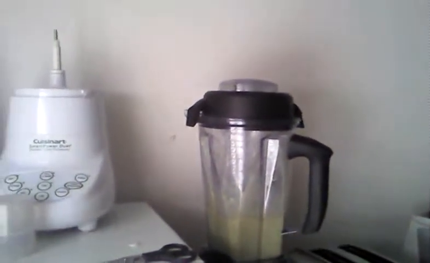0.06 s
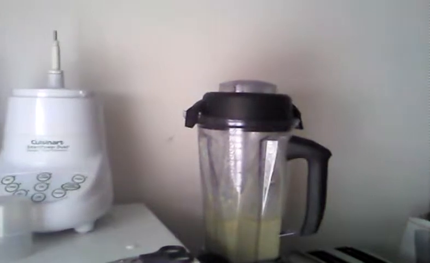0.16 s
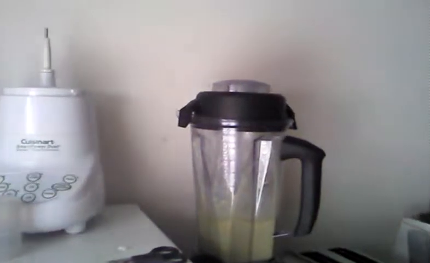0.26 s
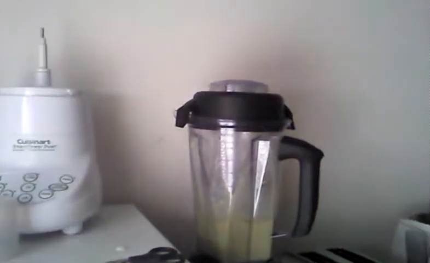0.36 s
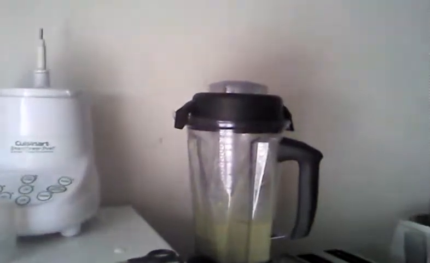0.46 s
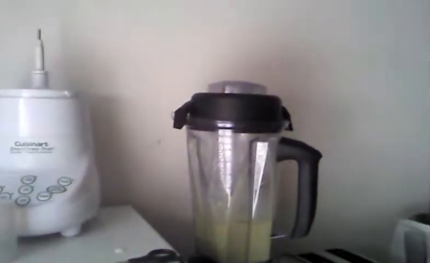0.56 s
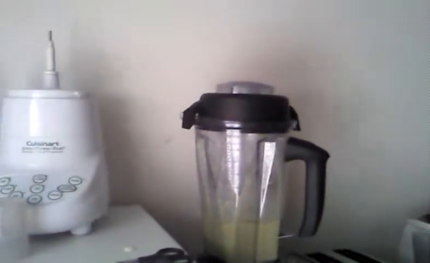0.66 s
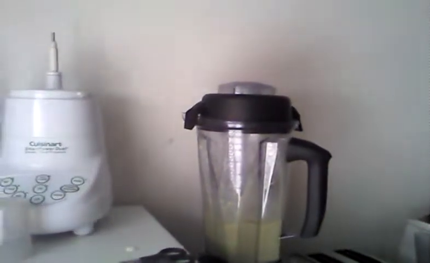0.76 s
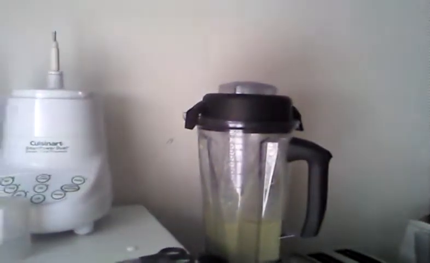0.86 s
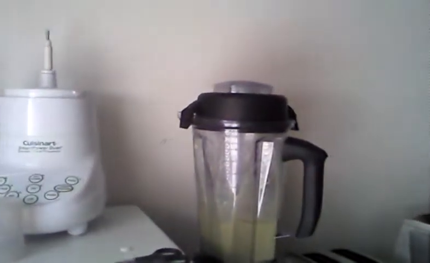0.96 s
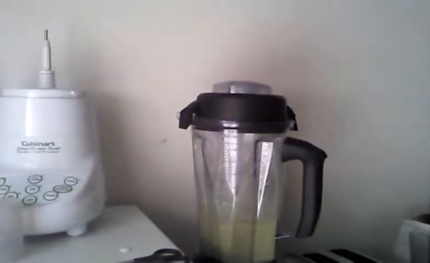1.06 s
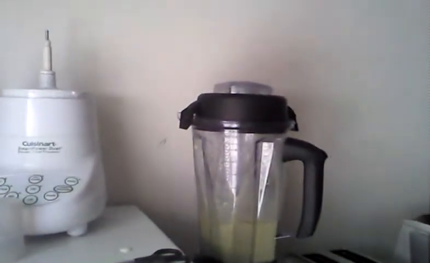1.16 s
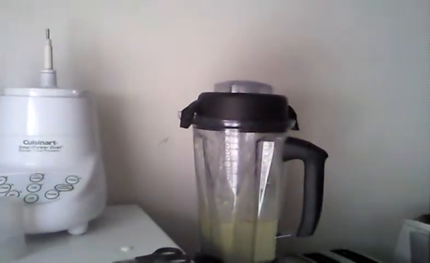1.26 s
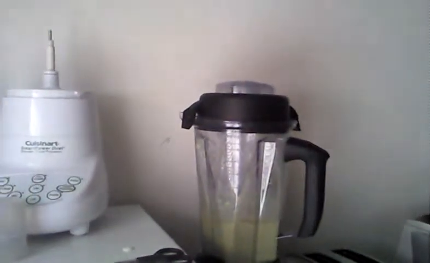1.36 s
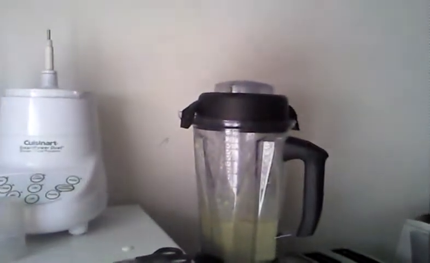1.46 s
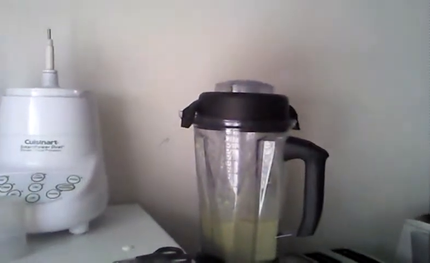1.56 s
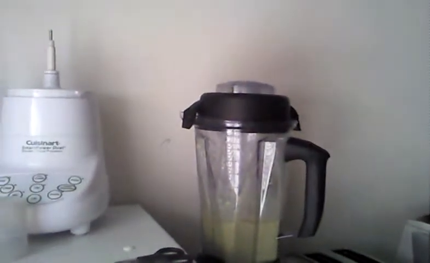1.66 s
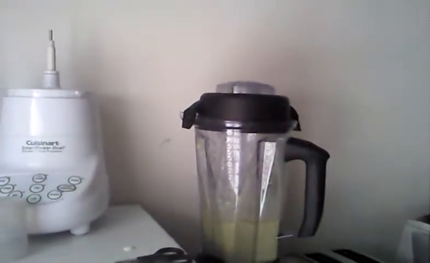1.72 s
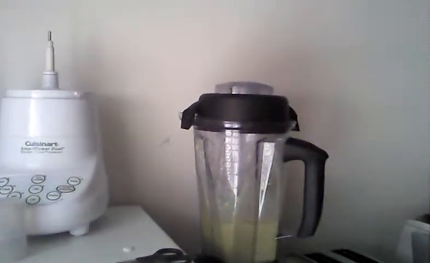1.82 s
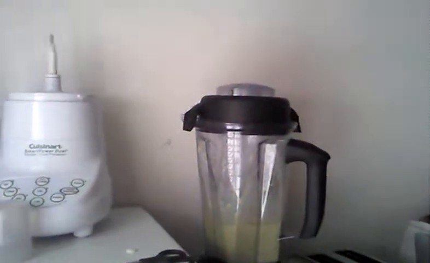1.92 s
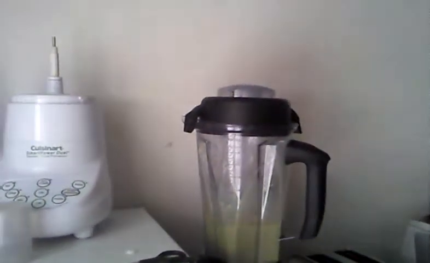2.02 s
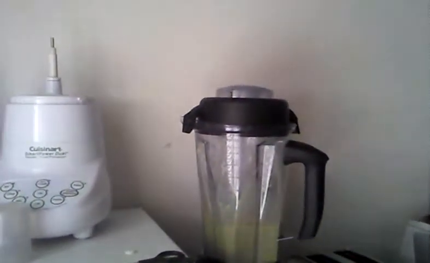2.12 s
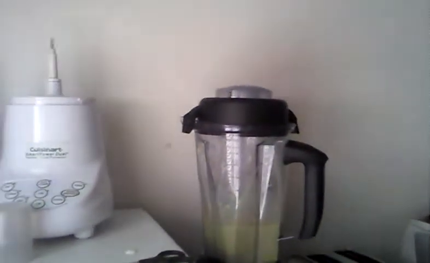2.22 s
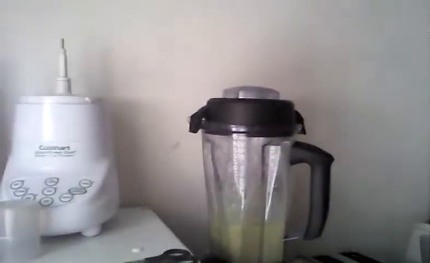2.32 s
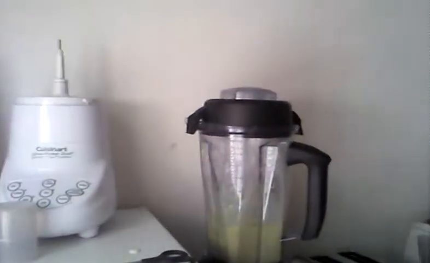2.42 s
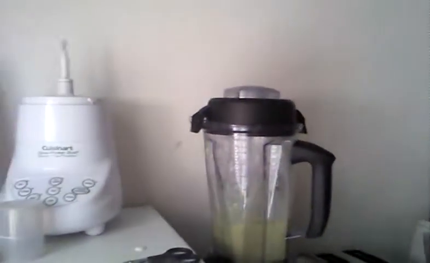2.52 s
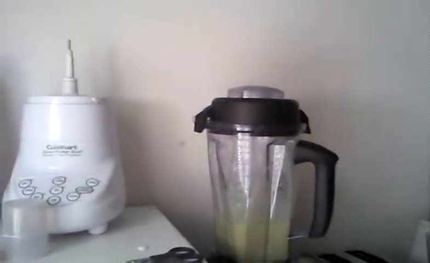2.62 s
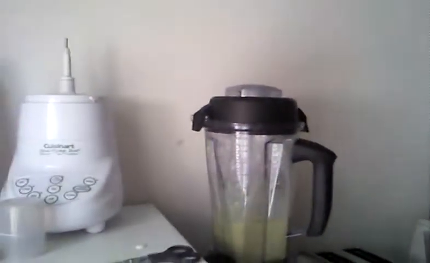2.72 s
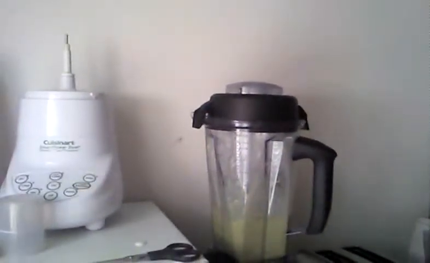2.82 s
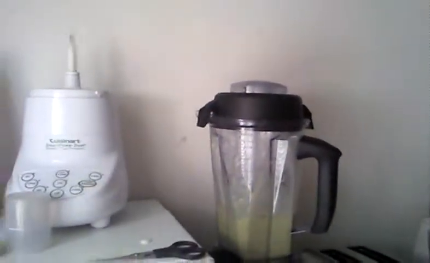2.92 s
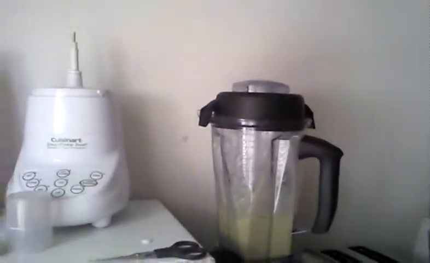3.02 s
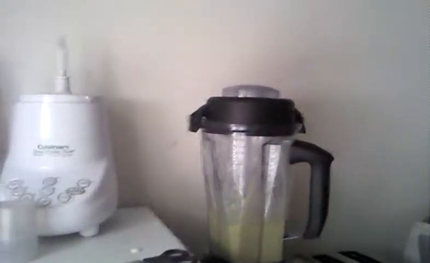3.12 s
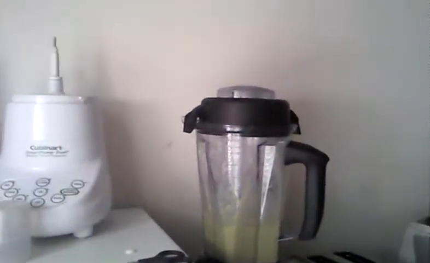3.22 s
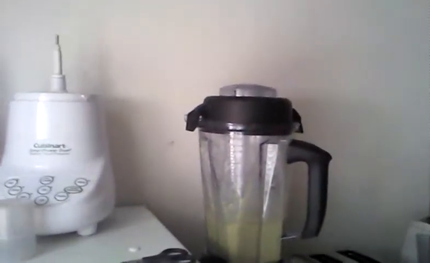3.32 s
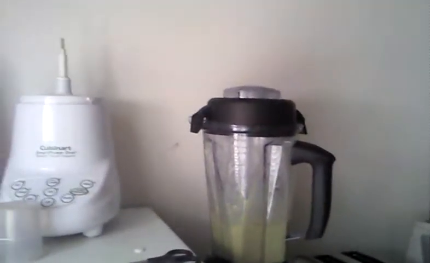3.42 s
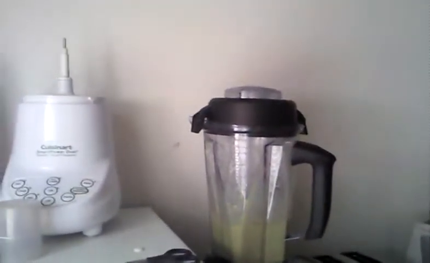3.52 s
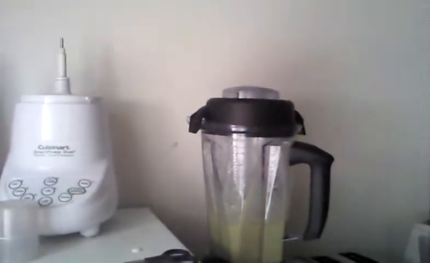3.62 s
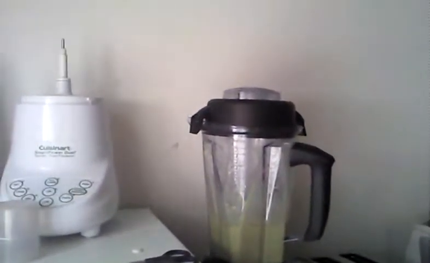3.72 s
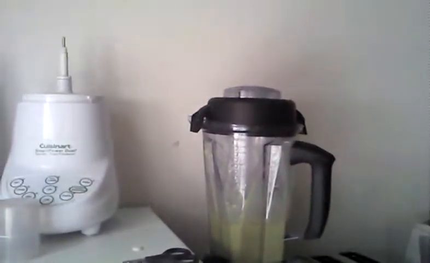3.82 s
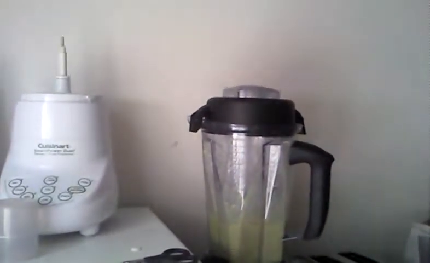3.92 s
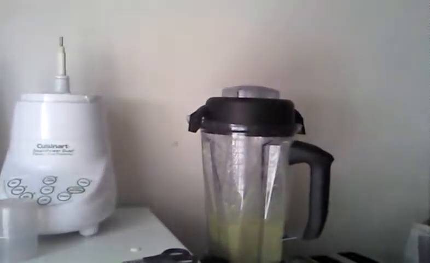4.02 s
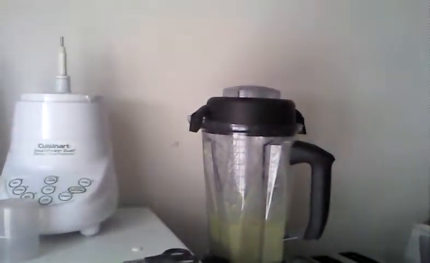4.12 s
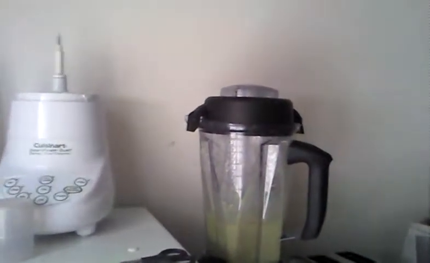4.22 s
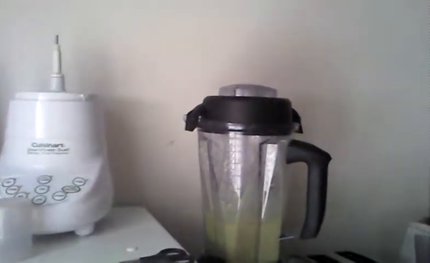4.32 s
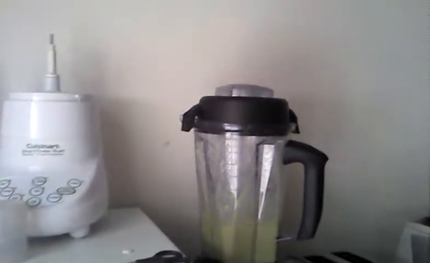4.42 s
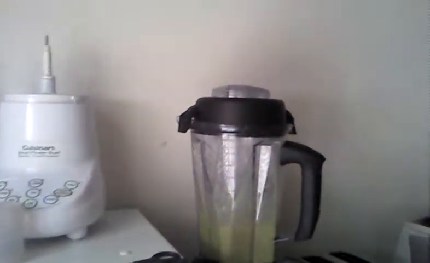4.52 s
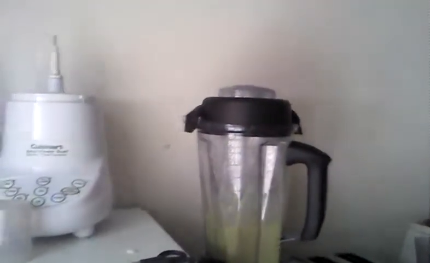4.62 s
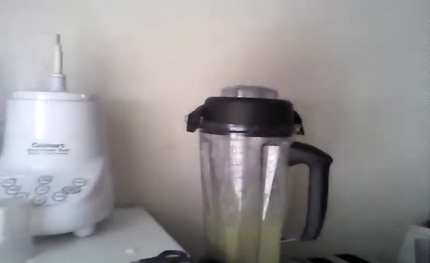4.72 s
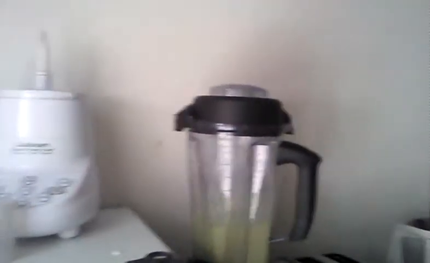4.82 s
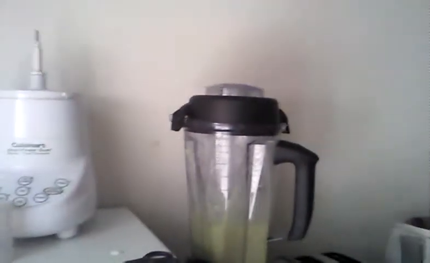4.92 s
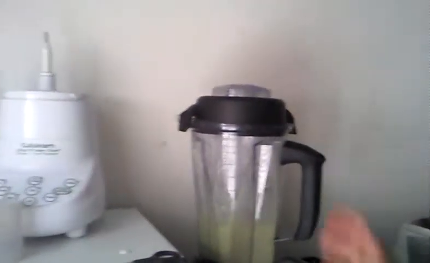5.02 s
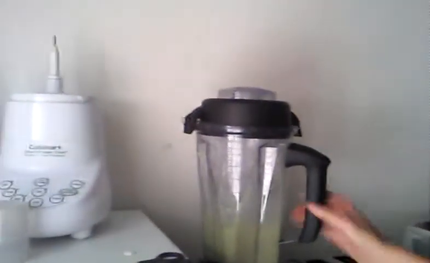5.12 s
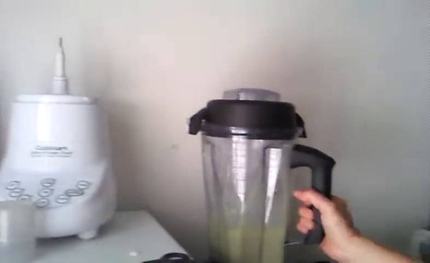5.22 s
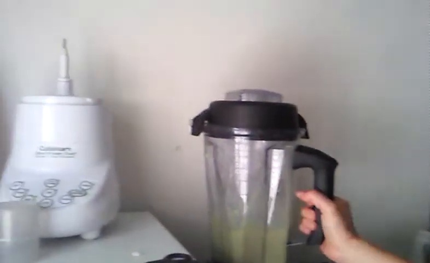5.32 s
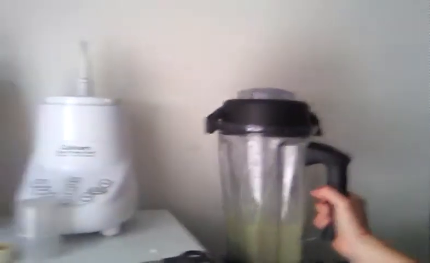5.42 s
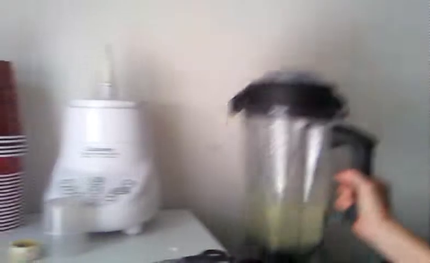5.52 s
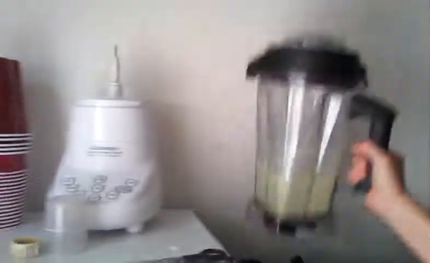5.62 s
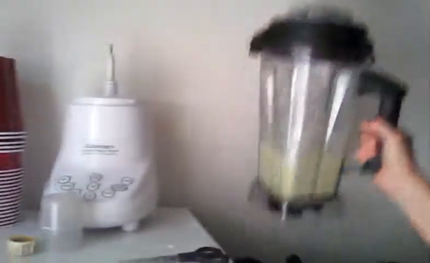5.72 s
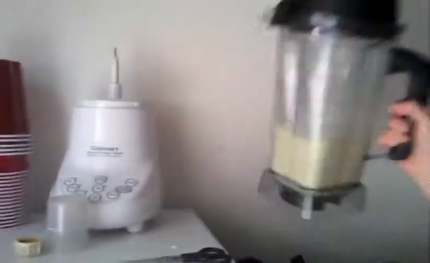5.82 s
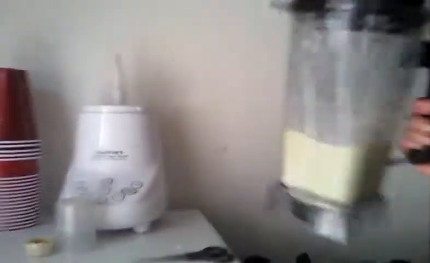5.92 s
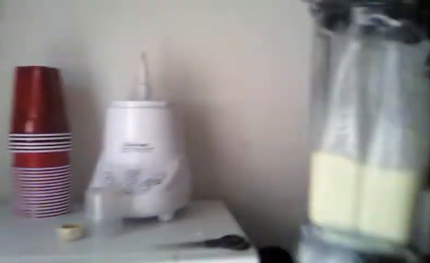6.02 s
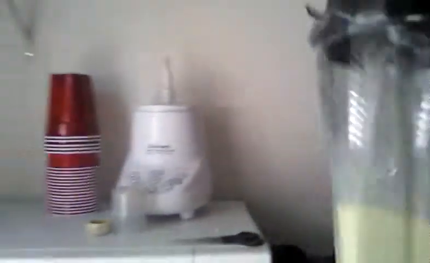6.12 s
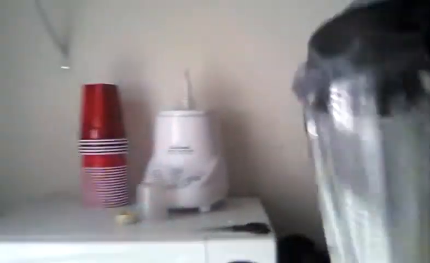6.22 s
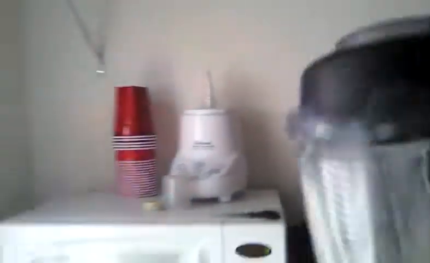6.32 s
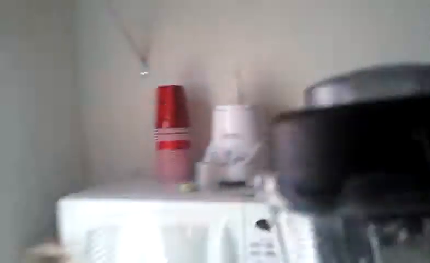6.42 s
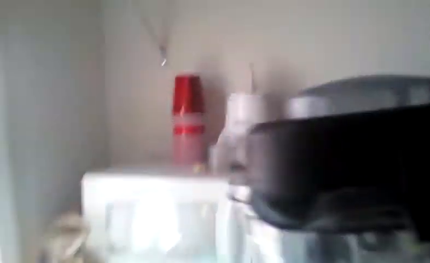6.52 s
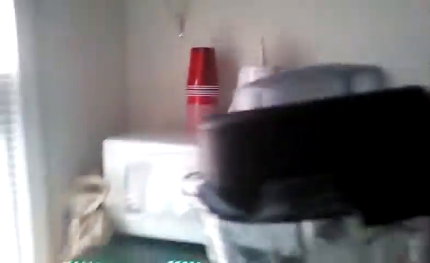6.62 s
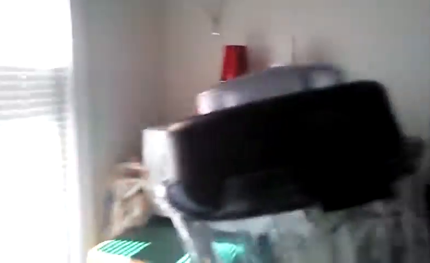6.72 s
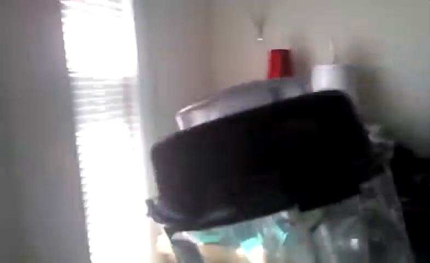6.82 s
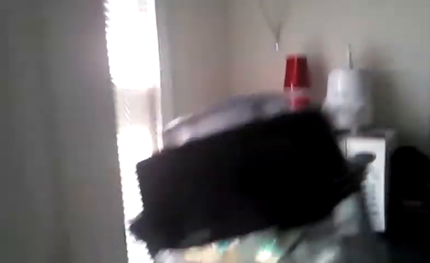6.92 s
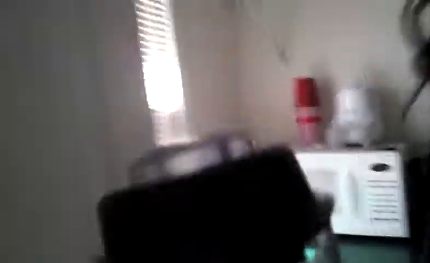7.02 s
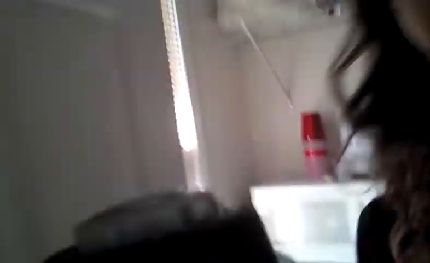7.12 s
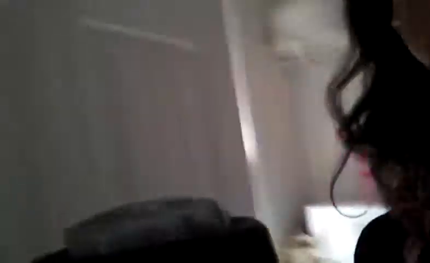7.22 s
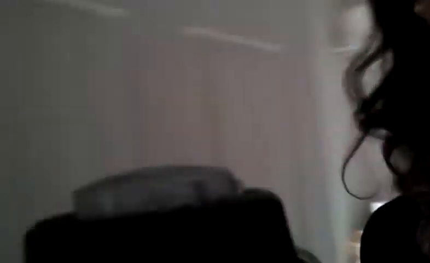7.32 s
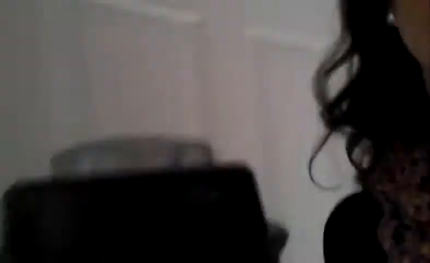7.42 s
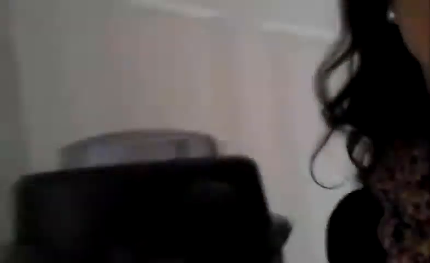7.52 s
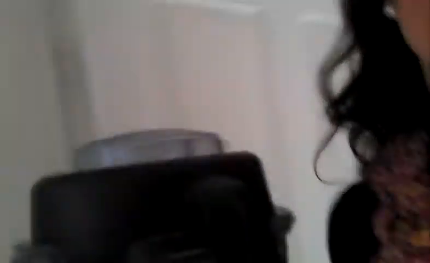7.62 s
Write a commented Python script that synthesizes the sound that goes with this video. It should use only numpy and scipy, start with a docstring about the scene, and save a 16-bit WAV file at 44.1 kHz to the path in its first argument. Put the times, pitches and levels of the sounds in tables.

```python
"""Blender churning an icy drink

In a small kitchen a blender hums and roars as its blades hit ice, its speed sagging and recovering
with the load. Switched off, it winds down with whining bearings; the jar scrapes off the coupling,
then bumps, clicks and rustles as it is carried. The close, narrow-band microphone overloads on peaks."""
import sys
import numpy as np
from scipy import signal
from scipy.fft import rfft, irfft, next_fast_len
from scipy.io import wavfile
from scipy.ndimage import uniform_filter1d

SR = 44100
rng = np.random.default_rng(int(sys.argv[2]) if len(sys.argv) > 2 else 0)


def wav_record(signal):
    """Record a signal, one row per channel, as 16-bit PCM in the file named by sys.argv[1]."""
    frames = np.transpose(np.atleast_2d(signal))
    bounded = np.clip(frames, -1, 1)
    # unit amplitude maps onto the largest positive 16-bit level
    quanta = np.round(bounded * 32767).astype(np.int16)
    wavfile.write(sys.argv[1], SR, quanta)


N = 337800
TIME = np.arange(N) / SR


def from_db(db):
    """Decibels to gain."""
    return 10 ** (np.asarray(db) / 20)


def rms_one(x):
    """Scale to rms 1."""
    return x / np.sqrt(np.mean(x ** 2) + 1e-20)


def arch(start, length):
    """A half-sine fade in and out."""
    return np.sin(np.pi * np.clip((TIME - start) / length, 0, 1))


def drift(rate_hz):
    """A smooth random modulator of rms 1."""
    hop, settle = 40, 2000
    pole = np.exp(-2 * np.pi * rate_hz * hop / SR)
    noise = rng.standard_normal(N // hop + settle + 2)
    slow = signal.lfilter([1], [1, -2 * pole, pole * pole], noise)[settle:]
    return np.interp(np.arange(N) / hop, np.arange(len(slow)), rms_one(slow))


def butter(x, hz, kind, order=2):
    """Causal Butterworth filter."""
    return signal.sosfilt(signal.butter(order, hz, kind, fs=SR, output="sos"), x + 1e-18)


def colour(x, spectrum):
    """Apply an EQ curve that rolls off beyond its ends; the result has rms 1."""
    size = next_fast_len(N)
    hz, db = np.transpose(spectrum)
    f = np.arange(size // 2 + 1) * SR / size + 1e-3
    curve = from_db(np.interp(np.log(f), np.log(hz), db))
    roll_off = np.minimum(1, np.minimum(f / hz[0], hz[-1] / f)) ** 2
    return rms_one(irfft(rfft(x, size) * curve * roll_off, size)[:N])


def resonate(x, peaks):
    """Boost or cut at each (centre [Hz], width [Hz], gain [dB])."""
    for hz, width, db in peaks:
        x = x + (from_db(db) - 1) * signal.lfilter(*signal.iirpeak(hz, hz / width, fs=SR), x)
    return x


def ring(push, hz, t60):
    """One mode: a unit impulse starts a dying sine of height 1."""
    r, w = from_db(-60 / (t60 * SR)), 2 * np.pi * hz / SR
    return signal.lfilter([0, np.sin(w)], [1, -2 * r * np.cos(w), r * r], push + 1e-18)


def impacts(per_s, spread_db):
    """A hail of small random hits of uneven size."""
    sizes = from_db(spread_db * np.minimum(rng.exponential(1, N), 4)) * rng.choice([-1, 1], N)
    return rms_one(sizes * (rng.random(N) < per_s / SR))


def kitchen(x, send_db, t60=0.21):
    """Add a short, dark, diffuse tail off the walls."""
    t = np.arange(SR // 2) / SR
    tail = butter(rng.standard_normal(len(t)), 3000, "low") * from_db(-60 * t / t60) * (t > .005)
    wet = signal.fftconvolve(x, tail / np.sqrt(np.sum(tail ** 2)))[:N] * np.sqrt(6000 / SR)
    return x + from_db(send_db) * wet


# EQ of the quiet kitchen: (frequency [Hz], level [dB])
ROOM_EQ = [(15, -51.5), (25, -32), (54, -13.5), (92, -1), (169, 1), (200, -5.5), (536, -12.5), (584, -20.5),
           (623, -14), (936, -14), (2070, -30), (3610, -29.5), (4200, -60), (5460, -73), (9240, -120)]

def room_tone(level_db):
    """A steady bed of low, dull noise."""
    return from_db(level_db) * colour(rng.standard_normal(N), ROOM_EQ)


# EQ of the friction: (frequency [Hz], level [dB])
RUSTLE_EQ = [(50, -22), (120, 9), (250, 4), (500, 3), (1200, -1), (1900, -1), (2600, -1.5), (3100, 2.5),
             (3600, 1), (4000, -3), (4500, -2)]
# Strokes of hand and clothes near the microphone: (time [s], length [s], level [dB])
HAND_STROKES = [(5.998, 0.15, -56), (6.484, 0.23, -50), (6.768, 0.045, -53), (7.008, 0.085, -46.5),
                (7.168, .093, -40), (7.307, 0.043, -38.5), (7.43, 0.078, -36), (7.508, .083, -43.5),
                (7.605, .062, -42)]

def rustle(grain_db, fade_s, carry_s=6.64, carry_grows_s=0.28):
    """Short strokes of grainy friction over a faint rubbing that grows as the jar is carried."""
    strokes = 0
    for start, length, db in HAND_STROKES:
        inside_s = np.minimum(TIME - start, start + length - TIME)
        strokes = strokes + from_db(db) * np.clip(inside_s / fade_s + .5, 0, 1)
    rubbing = from_db(-55.5) * np.clip((TIME - carry_s) / carry_grows_s, 0, 1) ** 2
    friction = colour(impacts(per_s=5100, spread_db=5.0), RUSTLE_EQ)
    return (strokes + rubbing) * friction * from_db(grain_db * drift(23))


# Sharp plastic clicks: (time [s], level [dB], pitch [Hz], t60 [s], half bandwidth [octaves])
PLASTIC_CLICKS = [(4.749, -9, 1270, 0.042, 0.62), (4.75, -6, 480, 0.15, 0.79),
                  (6.627, -37.5, 1160, .3, 0.15), (7.157, -19, 1090, 0.015, .38),
                  (7.159, -27.5, 2850, 0.015, 0.1), (7.222, -27.5, 1230, 0.063, 0.24),
                  (7.3631, -20.5, 2260, 0.012, .55), (7.404, -6.5, 1190, .0016, 0.5),
                  (7.517, -25, 1040, 0.22, .41)]

def clicks(snap):
    """Each click is a snap and a quickly dying crack around one broad pitch."""
    out, t = np.zeros(N), np.arange(SR // 4) / SR
    for start, db, hz, t60, half_width in PLASTIC_CLICKS:
        low, high = hz / 2 ** half_width, hz * 2 ** half_width
        crack = rng.standard_normal(len(t)) * from_db(-60 * t / t60)
        crack[0] = snap
        makeup = np.sqrt(SR / np.pi / (high - low))
        click = butter(crack, [low, high], "band") * from_db(db) * makeup
        at = int(start * SR)
        out[at:at + len(t)] += click[:N - at]
    return out


# Modes of the full jar: (pitch [Hz], level [dB], t60 [s])
JAR_MODES = [(115, -21, 0.41), (152, -13, .15), (200, -0.5, 0.1), (238.4, -5.5, 0.21), (284, -3, 0.18),
             (368.6, -3, 0.11), (451, -9.5, 0.12), (592, -1, 0.027), (796, -1.5, 0.03), (1170, 1, 0.024),
             (1530, -11, .05)]
# Bumps on the jar, duller for a softer contact: (time [s], level [dB], cut-off [Hz])
JAR_BUMPS = [(6.421, -21.5, 330), (6.436, -16.5, 265), (6.531, -29.5, 900), (6.633, -26, 380),
             (7.019, -4.5, 212), (7.035, -9, 300), (7.086, -22, 2020), (7.091, -9, 310), (7.123, -24, 250),
             (7.555, -19.5, 450), (7.588, -22, 600)]

def bumps(scatter_db):
    """Soft contacts wake the low modes of the jar, hard ones all of them; it radiates no deep bass."""
    out, tap = np.zeros(N), signal.unit_impulse(SR // 3)
    for start, db, cutoff_hz in JAR_BUMPS:
        push = butter(tap, cutoff_hz, "low")
        modes = sum((-1) ** k * ring(push, hz, t60) * from_db(mode_db + rng.normal(0, scatter_db))
                    for k, (hz, mode_db, t60) in enumerate(JAR_MODES))
        at = int(start * SR)
        out[at:at + len(tap)] += from_db(db) * modes[:N - at]
    return butter(out, 85, "high")


def rattle(level_db, hz=334.8, width_hz=17.6):
    """Small knocks on its seat keep the jar ringing just above the hum, so that the two beat."""
    knocks = impacts(per_s=230, spread_db=2.5)
    ringing = rms_one(butter(knocks, [hz - width_hz / 2, hz + width_hz / 2], "band"))
    return from_db(level_db) * arch(start=0.72, length=1) * ringing


# Resonances and hollows of jar, housing and room: (centre [Hz], width [Hz], gain [dB])
TIMBRE_EQ = [(179, 24, 2), (284, 20, 6), (340.4, 22, 9), (447, 28, 5), (475.6, 15, -6), (642, 5.4, 6.5),
             (740, 66, 3.5), (827, 150, -4.5), (876, 8.7, 8), (1144, 18, 2.5), (1253, 61, 4),
             (1352, 130, -3.5), (1503, 32, 3.5), (1583, 40, 6), (1797, 70, 4)]

def timbre(x, slosh_db=0):
    """Jar, housing and room colour a sound; sloshing damps and frees each resonance."""
    peaks = [(hz, width, db + slosh_db * drift(7.5) if slosh_db else db) for hz, width, db in TIMBRE_EQ]
    return rms_one(resonate(x, peaks))


# Squeals of the coupling: (time [s], length [s], level [dB], start pitch [Hz], end pitch [Hz])
SQUEAL_GLIDES = [(5.344, .14, -19, 1380, 1697), (5.474, 0.19, -37.5, 1686, 1676),
                 (5.477, 0.23, -29.5, 1297, 1167)]

def squeals(roughness, flutter_db):
    """Stick and slip: short glides of unsteady pitch and strength."""
    out = 0
    for start, length, db, start_hz, end_hz in SQUEAL_GLIDES:
        glide = np.interp(TIME, [start, start + length], [start_hz, end_hz])
        hz = glide * (1 + roughness * drift(155))
        envelope = arch(start, length) * from_db(db + flutter_db * drift(60))
        out = out + envelope * np.sin(2 * np.pi * np.cumsum(hz) / SR)
    return out


def coupling(level_db, scrape_db, contact_s=5.37, hold_s=0.11):
    """The spinning coupling slips, scraping and juddering the jar as it is lifted."""
    slips = impacts(per_s=530, spread_db=2.5)
    judder = timbre(butter(slips, [70, 680], "band"))
    scrape = from_db(scrape_db) * rms_one(butter(slips, [3420, 3620], "band", order=1))
    t = TIME - contact_s
    attack_db_per_s, release_db_per_s = 601.5, 304
    envelope_db = attack_db_per_s * np.minimum(t, 0) - release_db_per_s * np.maximum(t - hold_s, 0)
    return (judder + scrape) * from_db(level_db + envelope_db)


def lifted(start_s=5.54, length_s=0.18):
    """0 with the jar seated, 1 once it is clear of the base."""
    return np.clip((TIME - start_s) / length_s, 0, 1)


# The motor sagging and recovering under load: (time [s], shaft speed [Hz])
POWERED_SPEED = [(0, 262), (.44, 301), (.7, 314), (.98, 321), (1.35, 303), (1.63, 291), (1.88, 269),
                 (2.26, 306), (2.5, 320), (2.95, 332), (3.34, 334)]

def shaft_speed(off_s=3.34, drag_s=2.65, friction_hz_per_s=40):
    """Turns per second: wavering under power, then braked by the drink's drag and steady friction."""
    powered = np.interp(TIME, *np.transpose(POWERED_SPEED))
    decay = np.exp(-np.maximum(TIME - off_s, 0) / drag_s)
    friction_hz = friction_hz_per_s * drag_s
    return np.maximum((powered + friction_hz) * decay - friction_hz, 1)


def octaves(speed, nominal_hz=300):
    """Octaves above nominal speed."""
    return np.log2(speed / nominal_hz)


def pull(speed):
    """1 while the motor gains speed hard, -1 while it loses it fast."""
    hz_per_s = uniform_filter1d(np.gradient(speed) * SR, size=SR // 5)
    return np.clip(hz_per_s / 85, -1, 1)


def vortex(speed):
    """1 when the blades are fast enough to whirl the whole drink, 0 when they only stir it."""
    return np.clip((speed - 220) / 60, 0, 1)


def shaft_angle(speed, jitter):
    """Angle of a shaft that the uneven load jostles."""
    return 2 * np.pi * np.cumsum(speed * (1 + jitter * drift(14.05))) / SR


def shaft_tones(speed, partials, flutter_db, jitter):
    """Wavering tones locked to the shaft, faded out towards 5 kHz."""
    angle = shaft_angle(speed, jitter)
    tones = 0
    for multiple, db in partials:
        top_fade = np.clip((5000 - multiple * speed) / 500, 0, 1)
        tones = tones + from_db(db + flutter_db * drift(11.0)) * np.sin(multiple * angle) * top_fade
    return tones


# Bearing tones, each sung by one panel of the housing:
# (pitch [x shaft speed], level [dB], panel centre [Hz], panel width [Hz])
BEARING_TONES = [(6.1, -23.5, 1400, 190), (8.63, -13, 1185, 130), (11.5, -21.5, 770, 110),
                 (22, -23.5, 1490, 170), (45, -29, 3260, 290)]

def bearings(speed, rasp_db, db_per_octave=12.5):
    """Each rough, falling whine stands out while it crosses its panel's resonance."""
    whine = 0
    for multiple, db, hz, width in BEARING_TONES:
        tone = shaft_tones(speed, [(multiple, db)], flutter_db=1.5, jitter=.01)
        whine = whine + butter(tone, [hz - width / 2, hz + width / 2], "band")
    return whine * from_db(db_per_octave * octaves(speed) + rasp_db * drift(54))


# Low drone of the rotor: (pitch [x shaft speed], level [dB])
ROTOR_TONES = [(1, -4.5), (2.002, -10), (2.401, -10), (2.997, -9.5)]

def rotor(speed, db_per_octave=5.5, vortex_db=-6, lift_db=-22):
    """The base radiates mainly the low-mid rotor tones, which swell falling through its resonances."""
    level_db = -23.5 + db_per_octave * octaves(speed) + vortex_db * vortex(speed) + lift_db * lifted()
    tones = shaft_tones(speed, ROTOR_TONES, flutter_db=4.0, jitter=0.01379) * from_db(level_db)
    low_mids = butter(butter(tones, 180, "high", order=3), 420, "low")
    return resonate(low_mids, [(323, 54, 15.9), (71, 2.33, 33.3)])


# Rough overtones of the loaded blades: (pitch [x shaft speed], level [dB])
BLADE_TONES = [(2, -26), (4, -32.5), (5, -24.5), (7, -35), (11, -34)]

def blades(speed, rasp_db):
    """A ragged whine that grows with speed and drops out early in the wind-down."""
    tones = shaft_tones(speed, BLADE_TONES, flutter_db=2.0, jitter=0.01218)
    return tones * from_db(rasp_db * drift(90)) * np.clip((speed - 230) / 80, 0, 1)


# How strongly the base answers the unbalanced shaft: (shaft speed [Hz], level [dB])
HUM_RESPONSE = [(150, -79.5), (225, -41), (256, -26), (272, -12), (283, -8), (300, -14), (316, -11.5),
                (327, -7), (336, -8)]

def hum(speed, flutter_db, pull_db, cage_db, start_db=-9, build_s=0.62):
    """The shaft shakes the base once a turn, more when slack; a bearing-cage tone beats against it."""
    response_db = np.interp(speed, *np.transpose(HUM_RESPONSE))
    fade_in_db = start_db * np.maximum(1 - TIME / build_s, 0)
    level_db = response_db + fade_in_db + pull_db * pull(speed) + flutter_db * drift(9.9)
    shaft = from_db(level_db) * np.sin(shaft_angle(speed, jitter=0.00592))
    cage = shaft_tones(speed, [(1.2, cage_db)], flutter_db=0, jitter=0.00594)
    cage = signal.lfilter(*signal.iirpeak(342, Q=9, fs=SR), cage)
    return np.sqrt(2) * (shaft + vortex(speed) * cage)


# EQs of the whirling drink, the stirred drink and the gritty top: (frequency [Hz], level [dB])
WHIRL_EQ = [(25, -31.5), (60, -8), (110, -3.5), (180, -0.5), (250, -2), (450, 4.5), (560, 1.5), (720, 3),
            (850, 0.5), (1300, 2.5), (1650, -2.5), (2000, -15.5), (2600, -24.5)]
STIR_EQ = [(25, -41), (70, 0), (130, -5), (200, 6), (300, 0.5), (450, 8), (600, 3.5), (850, 2.5),
           (1200, 6.5), (1650, 0), (2000, -18), (2600, -45.5)]
GRIT_EQ = [(1500, -26), (2000, -1.5), (2500, -0.5), (3000, -1), (3500, 2), (3900, -3), (4500, 0)]
# Swells as ice crowds the blades, dips as they run free: (centre time [s], length [s], gain [dB])
ICE_SWELLS = [(.35, 1.0, 0.07), (1.4, 0.56, 1), (1.73, 0.14, -1.5), (2.347, 0.31, 1), (2.99, 0.091, 2.5),
              (3.204, .07, -4), (3.307, 0.22, 2), (3.378, .03, -7), (3.69, 0.096, -2), (3.998, 0.65, 1.5)]

def churn(speed, surge_db, slosh_db, throb, pull_db=1.0, lift_db=-18):
    """Blades hit ice and froth in surges, louder with speed and a little harder once a turn."""
    whirl = vortex(speed)
    surges = from_db(surge_db * np.minimum(drift(38), 2) * (1 + whirl) / 2)
    once_a_turn = 1 + throb * np.sin(shaft_angle(speed, jitter=0.0089))
    stop_fade = np.minimum(1, speed / 30) ** 2
    per_s = 30 * speed + 4000
    hits = rms_one(impacts(per_s, spread_db=0.5) / np.sqrt(per_s))  # even level at any density
    hits = hits * surges * once_a_turn * stop_fade

    slush = timbre(whirl * colour(hits, WHIRL_EQ) + (1 - whirl) * colour(hits, STIR_EQ), slosh_db)
    grinding = colour(hits, GRIT_EQ)
    housing = rms_one(resonate(grinding, [(3380, 330, 3.5)]))  # its ring stands out as grinding fades
    grit = whirl * grinding + (1 - whirl) * housing

    swells_db = sum(db * arch(centre - length / 2, length) for centre, length, db in ICE_SWELLS)
    load_db = pull_db * pull(speed) + lift_db * lifted() + swells_db
    slush_db = -12.5 + 11 * octaves(speed) + load_db
    grit_db = -28.5 + 7.5 * octaves(speed) + 3 * whirl + load_db
    return slush * from_db(slush_db) + grit * from_db(grit_db)


def scene():
    """Mono mix of kitchen, handling, jar, motor and drink; one shaft speed drives the last two."""
    speed = shaft_speed()
    motor = hum(speed, flutter_db=1.5, pull_db=-1.5, cage_db=-23.0) + blades(speed, rasp_db=3.5)
    motor += kitchen(rotor(speed) + bearings(speed, rasp_db=1.0), send_db=-2)
    drink = churn(speed, surge_db=1.5, slosh_db=0.46, throb=0.2)
    contacts = bumps(scatter_db=1.5) + coupling(level_db=-22, scrape_db=-12)
    contacts += squeals(roughness=0.071, flutter_db=4.5)
    jar = kitchen(contacts, send_db=-3.0) + rattle(level_db=-15)
    handling = kitchen(clicks(snap=3.3), send_db=-20.5) + rustle(grain_db=3.5, fade_s=0.01)
    return (room_tone(level_db=-42) + handling + jar + motor + drink)[None]


def record(dry):
    """The microphone cuts the treble like a telephone; overload flattens the peaks and adds fizz."""
    edge_hz, stop_hz, overload, fizz_top_hz = 3867, 5000, 0.74, 15800
    narrow = butter(dry, edge_hz, "low", order=14)
    narrow = signal.sosfilt(signal.cheby2(12, 60, stop_hz, fs=SR, output="sos"), narrow)
    flattened = np.clip(narrow, -overload, overload)
    return signal.sosfilt(signal.ellip(10, .1, 80, fizz_top_hz, fs=SR, output="sos"), flattened)


dry = scene()
out = record(dry)
wav_record(out)
```